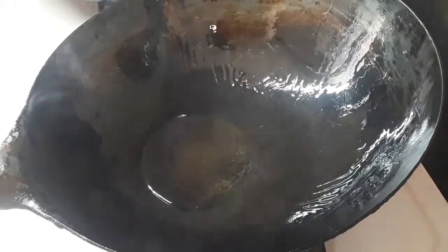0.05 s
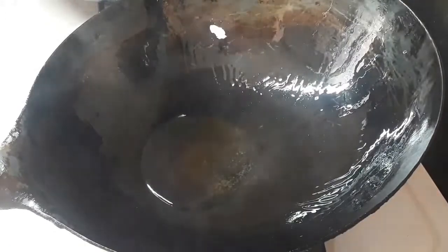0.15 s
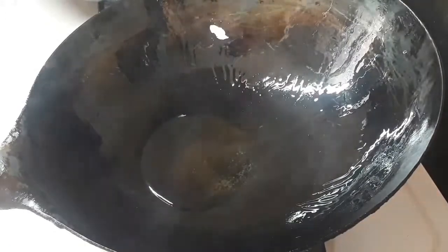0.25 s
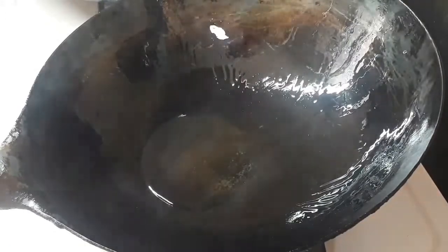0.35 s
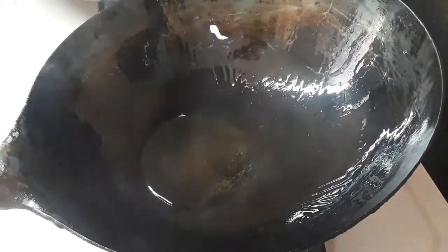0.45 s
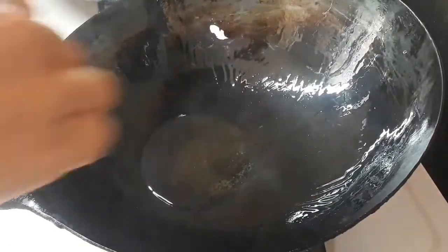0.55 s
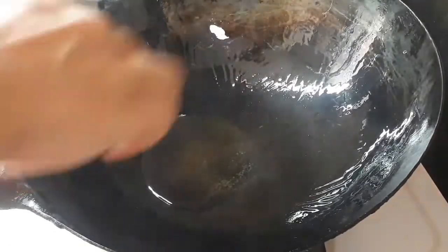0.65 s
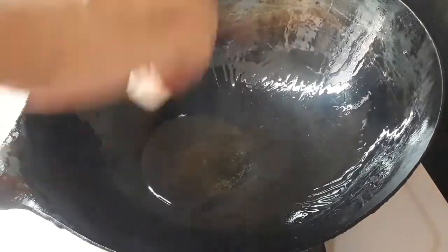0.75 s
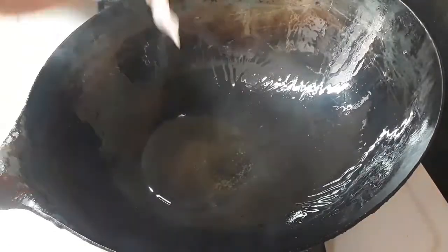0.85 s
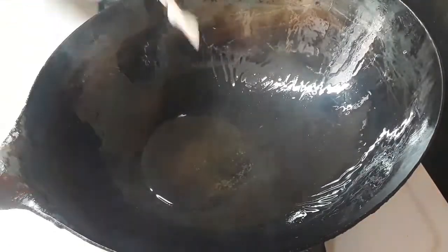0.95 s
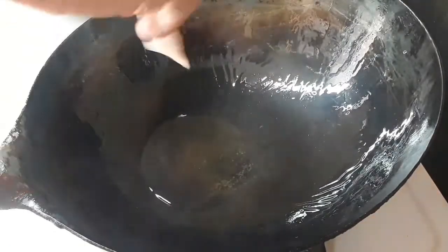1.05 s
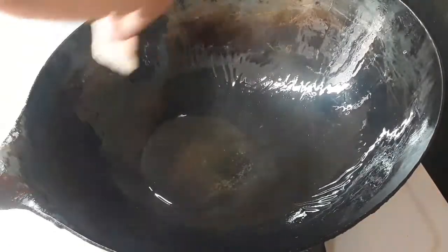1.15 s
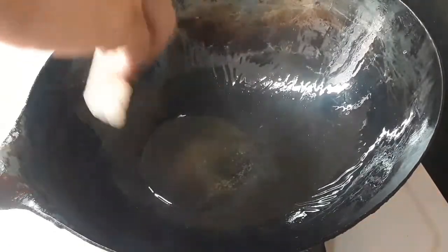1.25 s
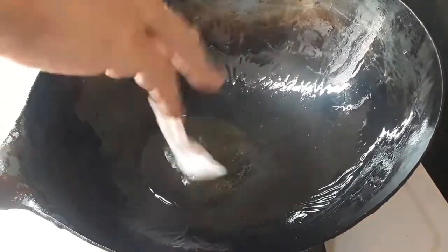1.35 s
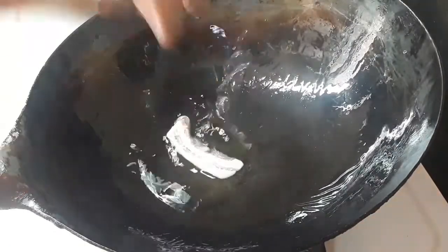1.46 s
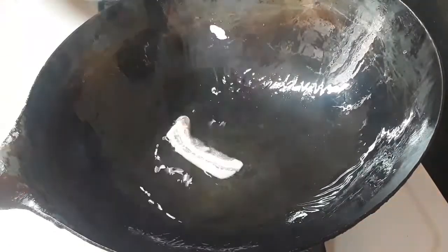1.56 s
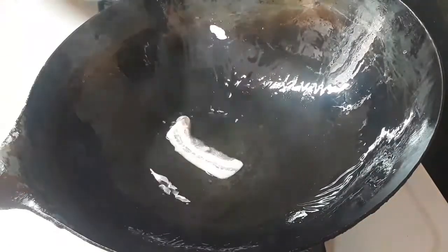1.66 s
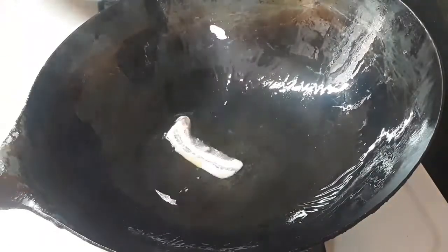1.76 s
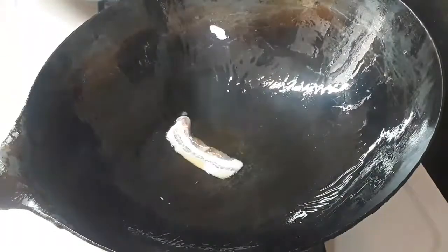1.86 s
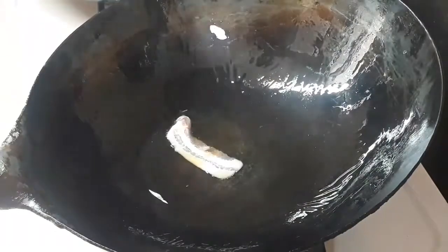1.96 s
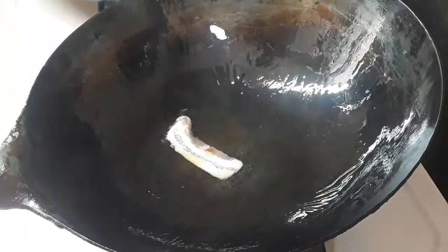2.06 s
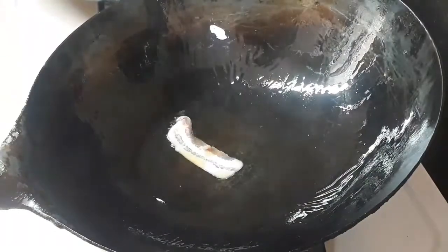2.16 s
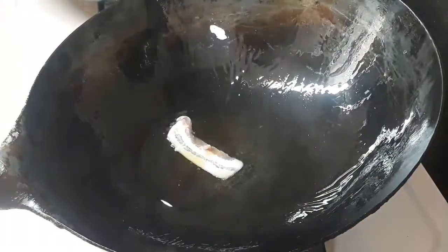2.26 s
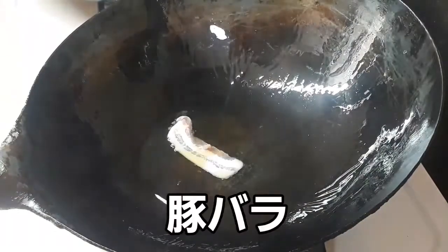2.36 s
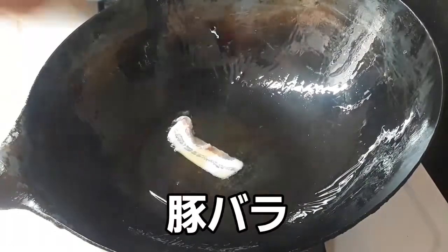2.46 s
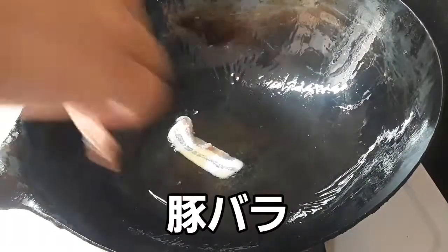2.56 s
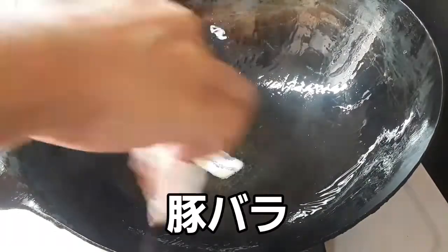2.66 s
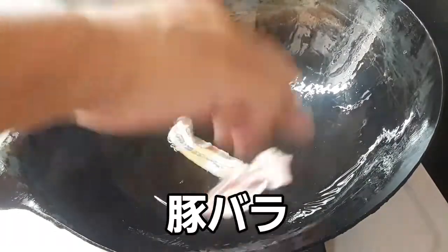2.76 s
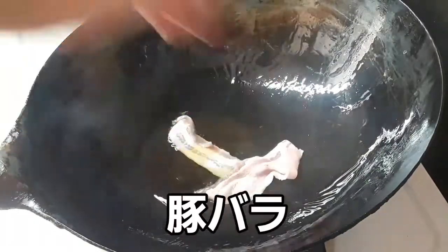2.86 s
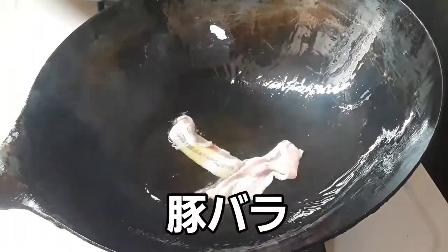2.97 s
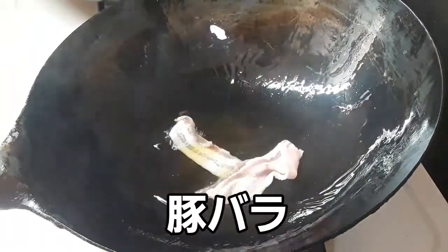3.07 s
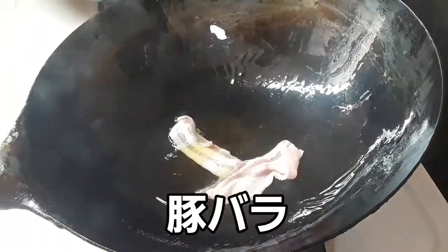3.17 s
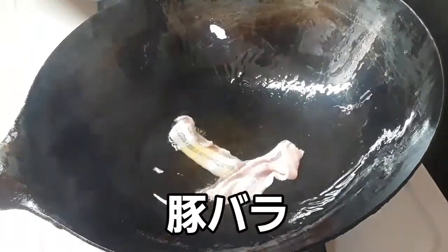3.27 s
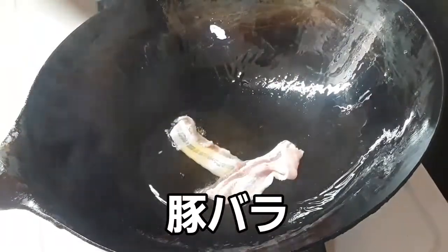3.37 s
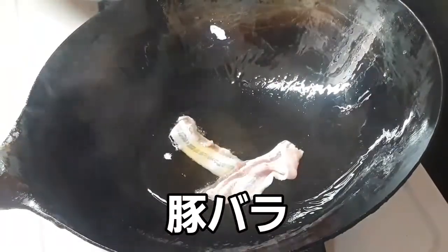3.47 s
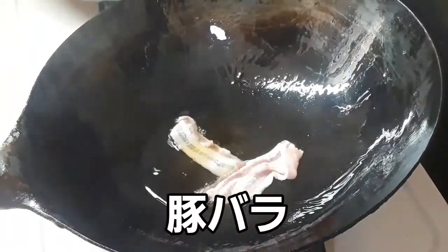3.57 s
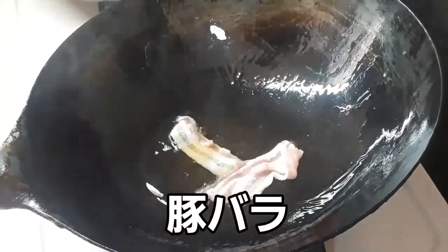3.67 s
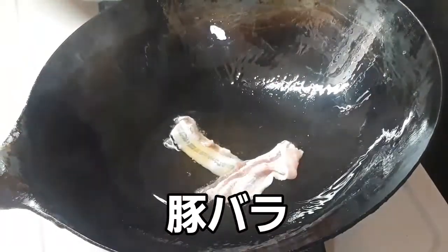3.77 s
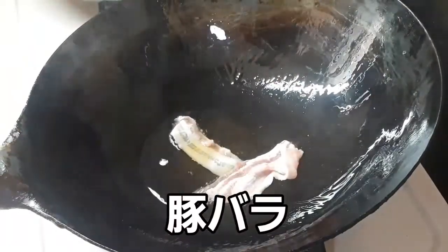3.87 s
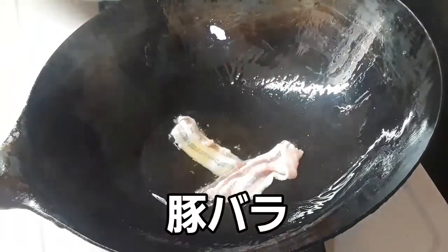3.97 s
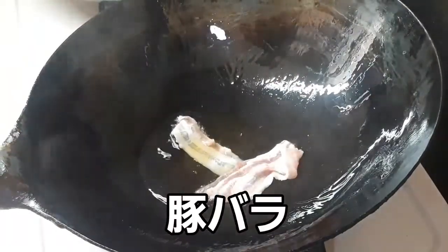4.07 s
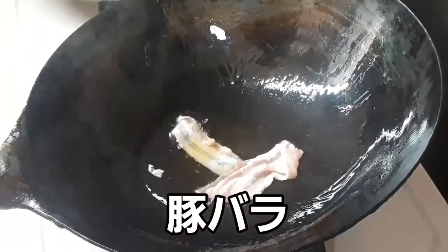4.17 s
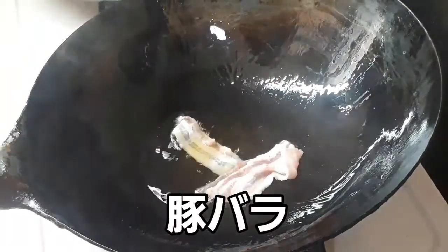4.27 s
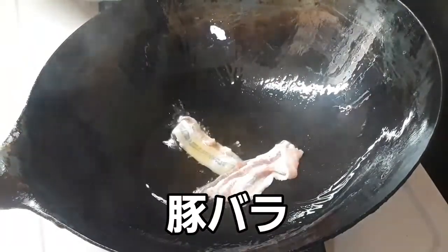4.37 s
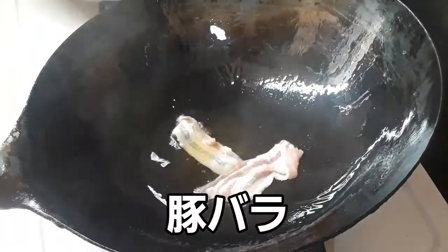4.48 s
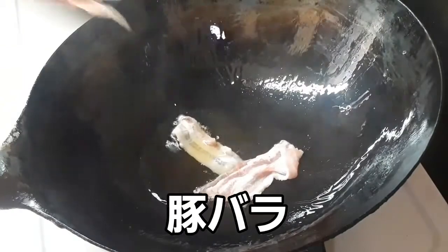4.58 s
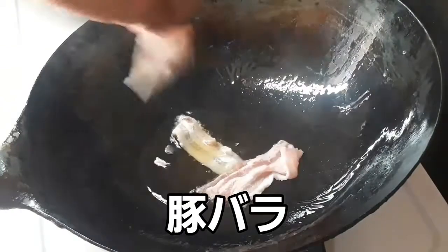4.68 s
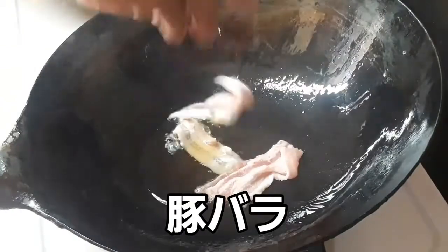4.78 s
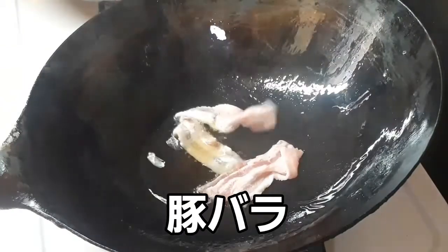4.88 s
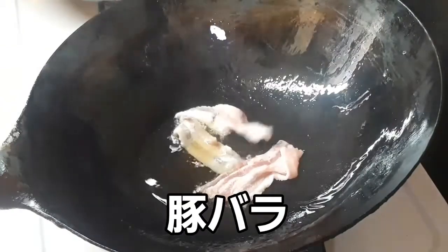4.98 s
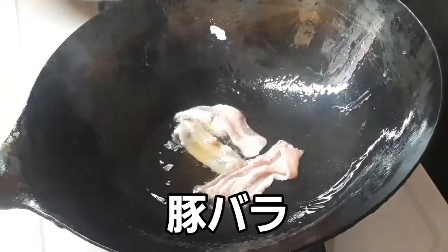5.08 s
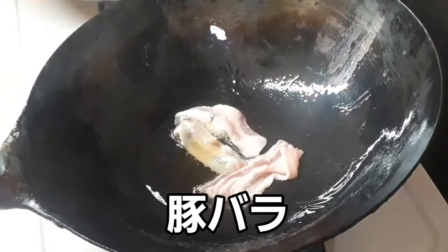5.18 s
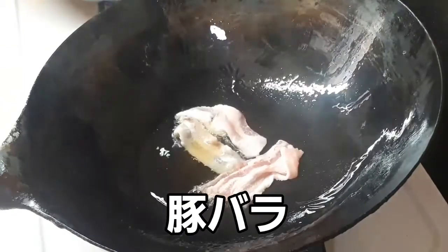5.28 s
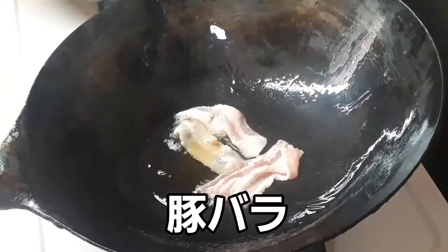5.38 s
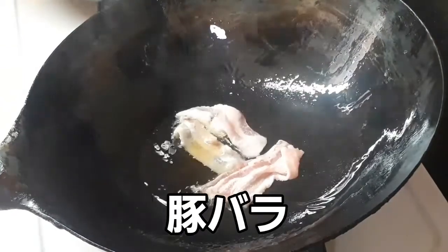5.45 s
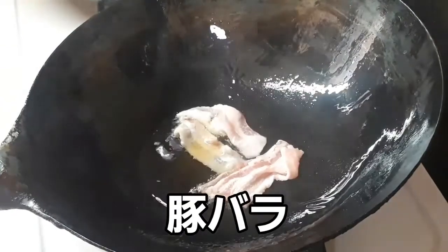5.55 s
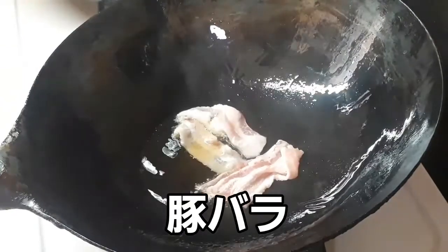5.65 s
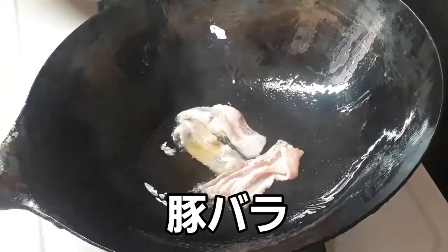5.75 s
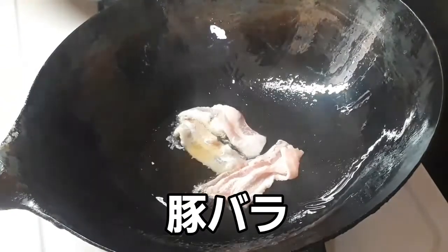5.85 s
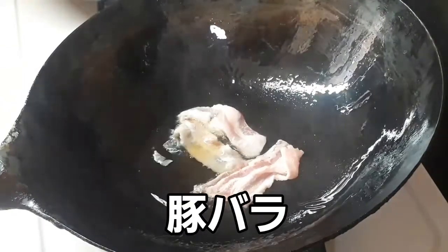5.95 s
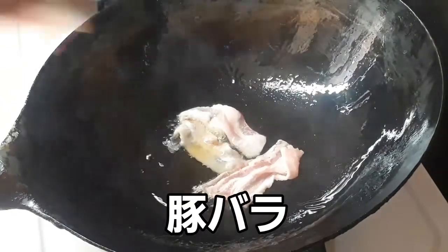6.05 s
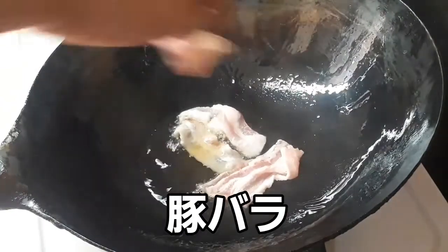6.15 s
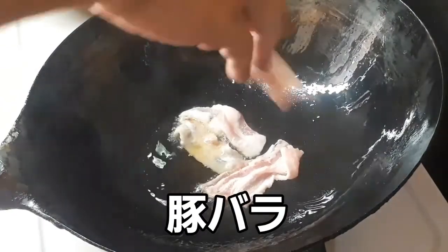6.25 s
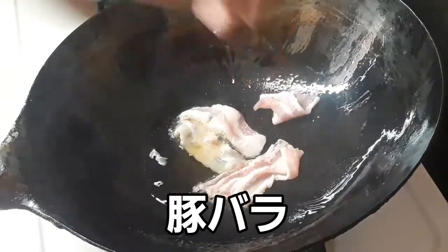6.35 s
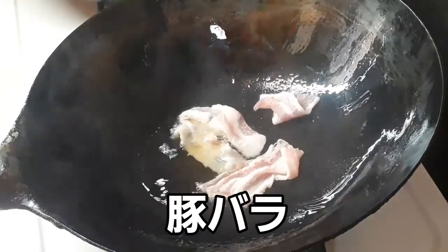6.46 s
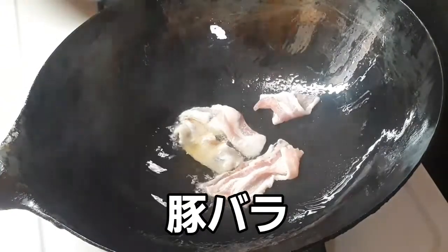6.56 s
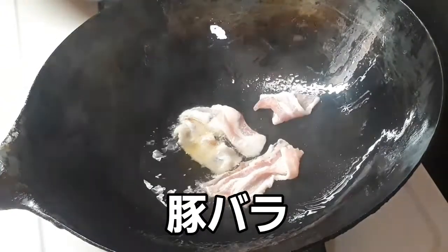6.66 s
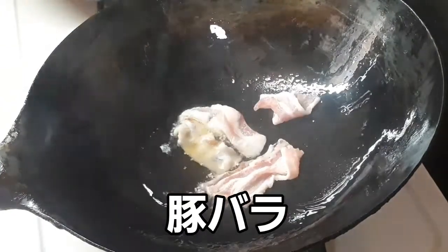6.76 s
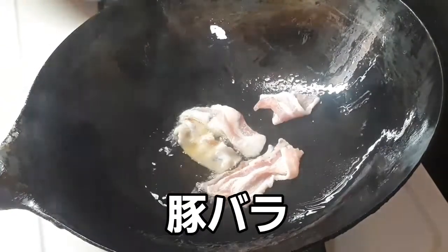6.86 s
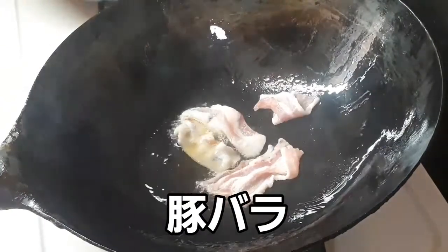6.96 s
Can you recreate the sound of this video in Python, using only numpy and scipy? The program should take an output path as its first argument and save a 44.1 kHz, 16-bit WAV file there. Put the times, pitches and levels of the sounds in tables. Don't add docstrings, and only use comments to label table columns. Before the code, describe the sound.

A quiet kitchen with a soft fan hum, then meat hits hot oil and sizzles ever louder with sharp spits and pops.

```python
import sys
import numpy as np
from scipy import signal
from scipy.fft import rfft, irfft
from scipy.io import wavfile
from scipy.ndimage import uniform_filter1d

SR = 44100
rng = np.random.default_rng(int(sys.argv[2]) if len(sys.argv) > 2 else 0)


def transcribe(signal):
    frames = np.atleast_2d(signal).T
    limited = np.clip(frames, -1, 1)
    pcm = np.round(limited * 32767).astype(np.int16)
    wavfile.write(sys.argv[1], SR, pcm)


def volts_from_decibels(level):
    exponent = np.asarray(level, float) / 20
    return 10 ** exponent


N = 309582
TIME = np.arange(N) / SR

# t/s, peak level/dB, centre f/Hz
HIGH_SPITS = [(2.89, -8, 10300), (3.031, -5.5, 9500), (3.8481, -2, 6370), (4.0178, -5, 9640),
              (4.3673, -12, 8000), (4.5, -3, 9800), (4.6965, -6.5, 10200), (4.8567, -6.5, 10300),
              (5.3363, -9, 7960), (5.4669, -6.5, 8800), (5.756, -4, 7950), (5.8377, -7, 8200),
              (5.9824, -5, 7600), (6.0982, -3.5, 10100), (6.2876, -4, 9750), (6.3202, -4, 9300),
              (6.357, -4, 10200), (6.39, -4, 7100), (6.7014, -2.5, 10100), (6.793, -4, 8900),
              (6.8764, -1.5, 8560), (6.9749, -2.5, 8800)]


def evened(x):
    return x / np.sqrt(np.mean(x ** 2) + 1e-20)


def read(points, hz):
    f, value = np.transpose(points)
    return np.interp(np.log(hz + 1), np.log(f + 1), value)


def level_over_time(points):
    return volts_from_decibels(np.interp(TIME, *np.transpose(points)))


def add(mix, s, sound):
    part = mix[round(s * SR):][:len(sound)]
    part += sound[:len(part)]


def coloured(x, gain):
    hz = abs(np.fft.fftfreq(8192, 1 / SR))
    log_gain = np.log(np.maximum(gain(hz), 1e-5))
    taps = np.fft.ifft(np.exp(np.conj(signal.hilbert(log_gain)))).real[:4096]
    return signal.oaconvolve(x, taps)[:len(x)]


def resonate(x, hz, width):
    turn = np.exp(2j * np.pi * np.cumsum(hz * np.ones(len(x))) / SR)
    r = np.exp(-np.pi * width / SR)
    return 2 * (turn * signal.lfilter([(1 - r) ** 2], [1, -2 * r, r * r], x / turn)).real


def bubbles(per_s, spread_db, wash, patchy_db, gust_db):
    size = volts_from_decibels(spread_db * np.minimum(rng.exponential(1, N), 4)) * (rng.random(N) < per_s / SR)
    burst = np.sqrt(signal.lfilter([1], [1, -.93], size ** 2))
    frames = dict(nperseg=256, noverlap=192)
    z = signal.stft((evened(burst) + wash) * rng.standard_normal(N), **frames)[2]
    chance = rng.standard_normal(z.shape[::-1]).T
    patches = evened(uniform_filter1d(uniform_filter1d(chance, size=4, axis=0), size=24, axis=1))
    gusts = evened(signal.lfilter([1], [1, -.9], chance[0]))
    return signal.istft(z * volts_from_decibels(patchy_db * patches + gust_db * gusts), **frames)[1][:N]


def kitchen(x):
    # f/Hz, t60/s
    decay = [(400, 0.26), (1500, 0.2), (4000, 0.29), (10000, 0.29)]
    hz, t, z = signal.stft(rng.standard_normal((3, SR // 3)), SR, nperseg=128)
    tails = signal.istft(z * volts_from_decibels(-60 * t / read(decay, hz)[:, None]), SR, nperseg=128)[1]
    tails = tails * np.clip(np.arange(tails.shape[1]) / SR / 0.0004 - .6, 0, 1)
    turns = np.sqrt(2 / 3) * np.cos(2 * np.pi * (.9 * TIME + np.arange(3)[:, None] / 6))
    return signal.oaconvolve(x * turns, tails / np.linalg.norm(tails[0]), axes=1).sum(0)[:N]


def fan():
    # f/Hz, spectral level/(dB per Hz)
    air_colour = [(15, -36), (25, -37), (44, -5), (67, -4.5), (81, -23), (106, -5.5), (145, -11.5),
                  (228, -6), (293, -14), (353, -9.5), (1010, -17.5), (1240, -18), (3500, -39.5),
                  (4550, -65), (7700, -120)]
    # t/s, level/dB
    draught = [(0, 6.5), (.2, 0.5), (.45, -2), (.9, 2.5), (1.2, -1), (1.6, -2.5), (2.6, 1.5), (7.02, 1)]
    # f/Hz, width/Hz, level/dB
    hum_modes = [(58.6, 8, -59), (118.3, 9.8, -59), (249, 84, -53), (2270, 440, -74), (7200, 300, -80),
                 (9400, 300, -81), (2450, 250, -77)]
    # f/Hz, spectral level/(dB per Hz)
    gas_colour = [(1650, -40), (2800, -53), (3110, -17.5), (3330, -20), (3790, -7), (3980, -8),
                  (6290, -9.5), (7340, 3), (7910, -5), (8050, -2), (9630, -8), (10800, -13), (12300, -33),
                  (15900, -59), (22000, -120)]
    # t/s, level/dB
    gas_level = [(0.3, -62), (0.612, -62.5), (0.894, -62), (1.52, -64.5)]
    air = evened(coloured(bubbles(0, 0, 1, 0.99, 0.76), lambda hz: volts_from_decibels(read(air_colour, hz))))
    gas = evened(coloured(bubbles(0, 0, 1, 2.2, 0.62), lambda hz: volts_from_decibels(read(gas_colour, hz))))
    hum = np.zeros(N)
    for hz, width, db in hum_modes:
        hum += volts_from_decibels(db) * evened(resonate(rng.standard_normal(N), hz, width))
    return volts_from_decibels(-46) * air * level_over_time(draught) + hum + gas * level_over_time(gas_level)


def small_sounds():
    # t/s, peak level/dB, f/Hz, t60/s
    knock = [(0.266, -20.5, 945, 0.014)]
    # t/s, f/Hz, level/dB
    squeak = [(.13, 8200, -70), (.17, 8150, -65), (.22, 8000, -62), (.245, 7700, -68), (.265, 6700, -65),
              (.285, 6200, -70), (.31, 6050, -71), (.335, 5400, -72)]
    out, t = np.zeros(N), np.arange(4000) / SR
    for s, db, hz, t60 in knock:
        add(out, s, volts_from_decibels(db - 60 * t / t60) * np.sin(2 * np.pi * hz * t) * np.minimum(t / 0.00055, 1))
    s, hz, db = np.transpose(squeak)
    whistle = evened(resonate(rng.standard_normal(N), np.interp(TIME, s, hz), 70))
    return out + whistle * volts_from_decibels(np.interp(TIME, s, db, -140, -140))


def pops():
    # t/s, peak level/dB, centre f/Hz
    lone = [(0.114, -35, 9100), (0.3274, -51, 7340), (0.6764, -48, 9000), (0.7594, -49, 8000),
            (3.8432, -13, 9300)]
    # t/s, peak level/dB, centre f/Hz, length/cycles
    first_drop = (0.9912, -6.5, 8800, 1.3)
    under_hiss_db, usual_cycles = -8.5, 1.15
    out, t = np.zeros(N), np.arange(400) / SR
    drops = lone + [(s, db + under_hiss_db, hz) for s, db, hz in HIGH_SPITS]
    for s, db, hz, cycles in [(*row, usual_cycles) for row in drops] + [first_drop]:
        crack = volts_from_decibels(db + 5.0) * np.sin(2 * np.pi * hz * t) * np.exp(-(t * hz / cycles - .6) ** 2 * 3)
        add(out, s, crack)
        add(out, s + .0018, .6 * crack)


    return out


def gaps():
    # t/s, level/dB
    rushes = [
        (2.89, -30.5),
        (4.881, -26.5),
    ]
    start_hz, end_hz, glide_s, width_hz = 4780, 3200, .25, 1300
    rise_s, fade_db_per_s = 0.088, 6
    out, age = np.zeros(N), np.arange(2 * SR) / SR
    hz = end_hz + (start_hz - end_hz) * np.exp(-age / glide_s)
    for s, db in rushes:
        noise, flutter = rng.standard_normal((2, len(age)))
        ragged = noise * volts_from_decibels(3.0 * evened(uniform_filter1d(flutter, size=600)))
        envelope = volts_from_decibels(db - fade_db_per_s * age) * np.minimum(age / rise_s, 1)
        add(out, s, envelope * evened(resonate(ragged, hz, width_hz)))
    return out


def spits():
    # t/s, peak level/dB, centre f/Hz
    first_slice = [(1.5524, -21.5, 7900), (1.5768, -20, 5200), (1.5847, -21.5, 3130), (1.6122, -13, 7600),
                   (1.62, -18, 2400), (1.637, -16, 5100), (1.68, -20, 2200), (1.6464, -14.5, 7700),
                   (1.6763, -14.5, 7900), (1.6888, -16.5, 5100), (1.7888, -43, 4730), (1.8044, -20, 5330),
                   (1.866, -15.5, 1850), (1.9632, -19.5, 5350), (2.0013, -26, 1880), (2.0294, -23, 1480),
                   (2.1171, -22.5, 2070), (2.1485, -20.5, 3400), (2.1487, -21, 6340), (2.2199, -12.5, 3030),
                   (2.2624, -17, 3100), (2.3194, -30, 3950), (2.581, -24.5, 2720), (2.6434, -27.5, 3630),
                   (2.6827, -22, 5400), (2.713, -17, 3580), (2.726, -15.5, 2230), (2.8585, -21.5, 3560)]
    thin = [(1.8, -26, 6150), (1.8644, -30, 7020), (1.8896, -29.5, 6800), (1.9614, -38, 6800),
            (2.0025, -22.5, 6740), (2.1283, -28, 6270), (2.2238, -30, 6240), (2.2485, -20, 6560),
            (2.368, -32, 7200), (2.4094, -22.5, 6150), (2.444, -37, 6760), (2.5501, -28, 6900),
            (2.583, -26, 7540), (2.714, -27, 7570), (2.837, -24, 6460)]
    crowded = [(2.9779, -10, 1880), (3.2453, -17, 3200), (3.654, -10, 2080), (3.8343, -7, 1850),
               (3.9165, -13, 2110), (3.9986, -10.5, 1370), (4.3066, -8, 2220), (4.367, -14.5, 1620),
               (4.46, -10, 1400), (4.5017, -3.5, 1900), (4.7082, -10, 1790), (4.7438, -18, 1290),
               (4.8785, -6, 1490), (5.047, -9, 2060), (5.0782, -5, 1420), (5.1651, -6, 3260),
               (5.2839, 2, 2100), (5.285, -2, 3280), (5.4941, -13, 1330), (5.5196, -13, 3000),
               (5.6396, -16, 3100), (5.7589, -11.5, 1480), (5.8808, -8.5, 1480), (6.1479, -12.5, 3100),
               (6.1796, -5.5, 1480), (6.2193, -9, 1700), (6.3219, -5, 1620), (6.35, -10, 2050),
               (6.393, -6, 2220), (6.996, -6, 1880)]
    dull = [(1.68, -28, 700), (1.866, -28, 700), (2.22, -23.5, 700), (2.714, -27, 990), (3.188, -16.5, 740),
            (3.851, -13, 608), (3.948, -14, 754), (4.307, -13, 742), (4.501, -12.5, 575),
            (4.877, -16.5, 690), (5.046, -13, 660), (5.282, -3.5, 920), (5.863, -13, 710),
            (6.022, -17, 670), (6.179, -12, 673), (6.349, -10, 685), (6.392, -5, 655)]
    lone_drops = [(0, -24, 9000), (0.0001, -33, 2000), (0.9915, -17, 8000), (0.9913, -22, 3200),
                  (0.9914, -23, 1200)]
    held = [(1.968, -23, 5000), (3.85, -10, 6000), (5.168, -18, 3600), (5.76, -9, 1480), (6.18, -14, 1700),
            (6.992, -11.5, 4300)]
    # table, t60/s, width/octaves
    kinds = [(first_slice, 0.14, 0.71), (thin, 0.3, 1), (crowded, 0.12, 0.6), (HIGH_SPITS, 0.13, 0.43),
             (dull, .11, 0.73), (lone_drops, 0.12, 1.1), (held, 0.17, 0.16)]
    out, t = np.zeros(N), np.arange(6144) / SR
    hz = np.fft.rfftfreq(len(t), 1 / SR) + 1
    edges = 1 / (1 + (hz / 10500) ** 14) / (1 + (350 / hz) ** 4)
    for table, t60, octaves in kinds:
        for s, db, centre_hz in table:
            noise, flutter, bands = rng.standard_normal((3, len(t)))
            ragged = noise * volts_from_decibels(1.06 * evened(uniform_filter1d(flutter, size=90)))
            ripple = uniform_filter1d(uniform_filter1d(bands[:len(hz)], size=40), size=40)
            pocket = volts_from_decibels(2.5 * evened(ripple))
            shape = np.exp(-2 * (np.log2(hz / centre_hz) / octaves) ** 2) + .09
            puff = evened(irfft(rfft(ragged) * shape * pocket * edges))
            snap = 1 + 0.57 * np.exp(-t / 0.0023)
            envelope = volts_from_decibels(db - 11.5 - 60 * t / t60) * snap * np.minimum(t / 0.00053, 1)
            add(out, s, envelope * puff)
    return out


def bowl_gain(hz):
    # f/Hz, width/Hz, level/dB
    modes = [(419.3, 34, 12.5), (656, 240, 1), (872, 51, 1.5), (1009, 13, 8), (1330, 125, 2), (1480, 21, 4),
             (1558, 100, -5.5), (1740, 43, 0.5), (1865, 174, 3.5), (2110, 52, 6), (2470, 110, 0),
             (2875, 360, -6.5), (3210, 100, 6.5), (3436, 73, 5), (3970, 320, 3), (3980, 2400, 1.5),
             (4990, 910, 2.5), (5600, 1250, -1.5), (7300, 120, 2), (8000, 210, -1.5)]
    return volts_from_decibels(sum(db / (1 + (2 * (hz - f) / width) ** 2) for f, width, db in modes))


def vigour(flash_db, boil_db, fine_flash, fine_boil, build_s, dries):
    # t/s, flash level/dB, boil level/dB, fineness/dB, drying/(dB per s)
    slices = [(0.0, -54.5, -55, 8.5, 53), (1.598, -28.5, -46.5, -3, 4), (2.898, -29, -25.5, 10, 1),
              (2.94, -24.5, -47, 10.5, 9), (4.89, -24, -30.5, 6.5, -1.5), (6.3, -40, -28.5, 16, 6.5)]
    # t/s, flash level/dB, fineness/dB
    surges = [(1.82, -32.5, -21), (2.2, -40, -11), (2.37, -38, -17), (2.69, -39.5, -13), (3.6, -33, 14),
              (3.7, -37, 15), (3.89, -22.5, -1), (3.86, -29, -4), (5.19, -32, -23), (5.35, -32.5, 16),
              (5.6, -28, 3), (5.92, -22.5, 5), (6.04, -25, 7), (6.22, -28.5, 11.5), (6.66, -32, 2),
              (7.02, -22, -10)]
    slice_rise, surge_rise, fall = 510, 200, 127
    lead_s = 0.028
    t = TIME[::32]

    def flash(s, db, rise):
        slope_db = np.where(t < s, rise * (s - t), fall * (t - s))
        return volts_from_decibels(2 * (db + flash_db - slope_db))

    power = np.zeros(len(t))
    for s, db, fine_db in surges:
        power += flash(s, db + fine_flash * fine_db, surge_rise)
    for s, first_db, level_db, fine_db, drying in slices:
        age = np.maximum(t - s + lead_s, 0)
        dried_db = dries * drying * age
        build = (1 - np.exp(-age / build_s)) ** 2
        power += volts_from_decibels(2 * (level_db + boil_db + fine_boil * fine_db - dried_db)) * build
        power += flash(s, first_db + fine_flash * fine_db, slice_rise)
    return np.interp(TIME, t, np.sqrt(power))


def sizzle():
    # f/Hz, spectral level/(dB per Hz)
    fizz = [(150, -45), (250, -22), (414, -15.5), (487, -11.5), (675, -0.5), (951, -8.5), (1320, 2.5),
            (2080, -3), (2740, -9), (3220, -14.5), (4920, -13), (7770, 1), (10600, -3.5), (11600, -16.5),
            (12300, -38), (15900, -135), (22000, -120)]
    sizes = [
        (-11.5, -0.33, 0.35, 0, .12, 1.06),
        (-0.6, -0.76, 0.11, 0, .03, 1.22),
        (-0.8, -0.55, 0.88, 0.52, 0.015, 1.36),
    ]
    splits = [0, 2600, 6000, SR / 2]
    swarms = [bubbles(1200, 3.0, 1.1, 1.5, .9), bubbles(700, 3.2, .9, 1.8, .9), bubbles(700, 3, 1.1, 1.6, .7)]
    shared = bubbles(200, 3.5, .6, 1.5, 1.2)
    out = np.zeros(N)
    for swarm, size, lo, hi in zip(swarms, sizes, splits[:-1], splits[1:]):
        def band(hz):
            return volts_from_decibels(read(fizz, hz)) / np.sqrt((1 + (lo / (hz + 1)) ** 12) * (1 + (hz / hi) ** 12))
        out += vigour(*size) * evened(coloured(swarm + 0.37 * shared, band))
    return out


def scene():
    oil = volts_from_decibels(-2.0) * coloured(sizzle() + spits(), bowl_gain) + gaps()
    cracks = pops()
    quiet = small_sounds() + fan()
    reflections = kitchen(volts_from_decibels(-7.0) * oil + volts_from_decibels(-14.0) * cracks)
    return (oil + cracks + quiet + reflections)[None]


def low_pass(x):
    return signal.sosfilt(signal.butter(12, 12410, fs=SR, output="sos"), x)


def record(dry):
    # t/s, level/dB
    gain = [(0, 0.5), (6.39, -0.5), (6.43, -5), (7.02, -5.5)]
    x = np.tanh(dry * level_over_time(gain) / .95) * .95
    x = signal.lfilter(*signal.butter(4, 47, "high", fs=SR), x)
    x = signal.oaconvolve(x, signal.firwin(255, 12300, window=("kaiser", 8), fs=SR)[None], "same")
    return low_pass(x)


dry = scene()
out = record(dry)
transcribe(out)
```